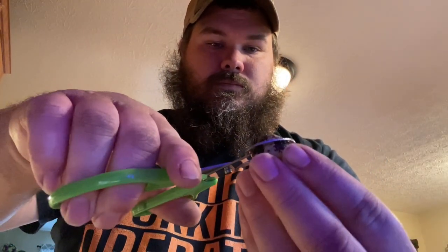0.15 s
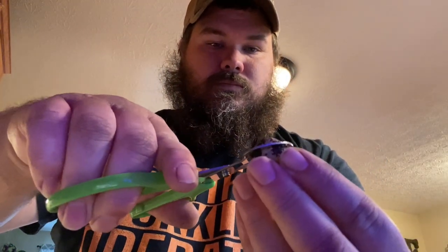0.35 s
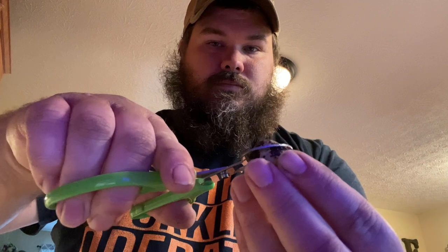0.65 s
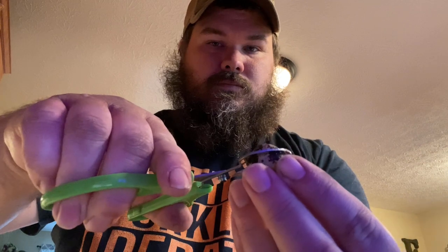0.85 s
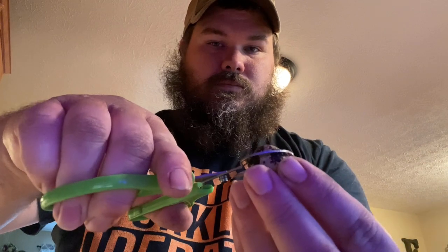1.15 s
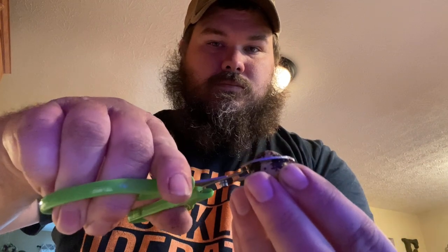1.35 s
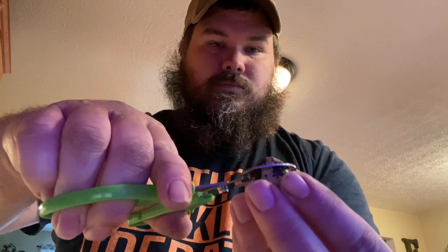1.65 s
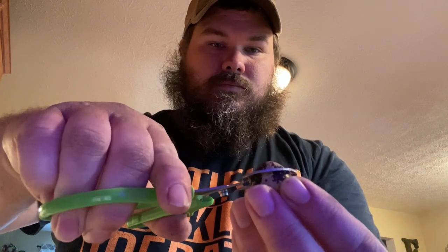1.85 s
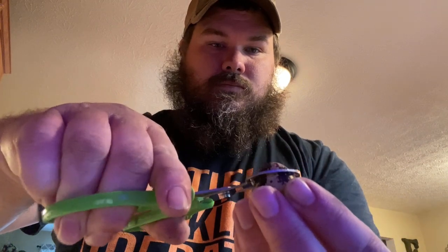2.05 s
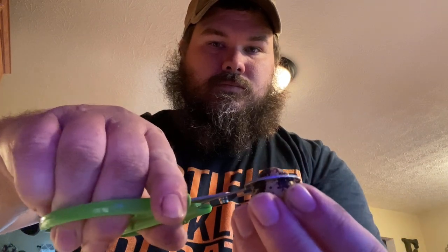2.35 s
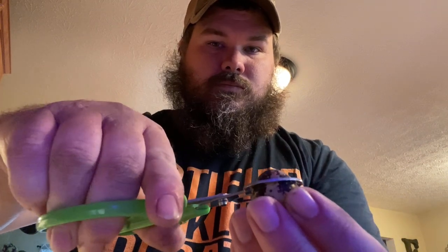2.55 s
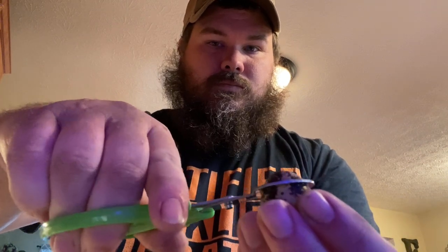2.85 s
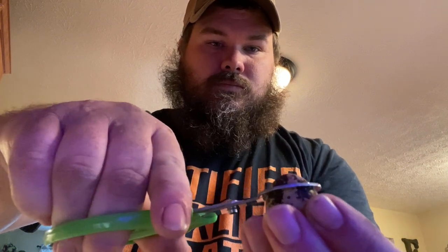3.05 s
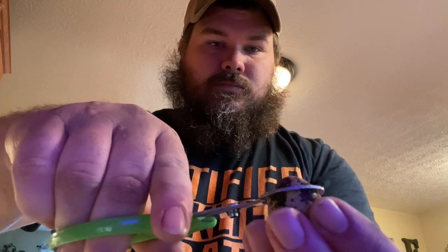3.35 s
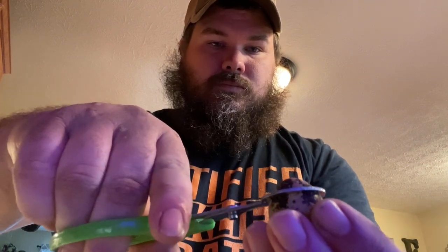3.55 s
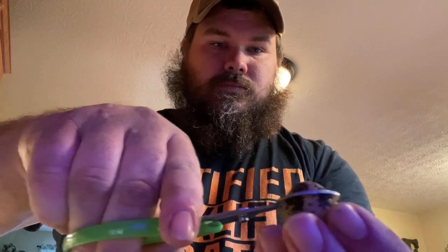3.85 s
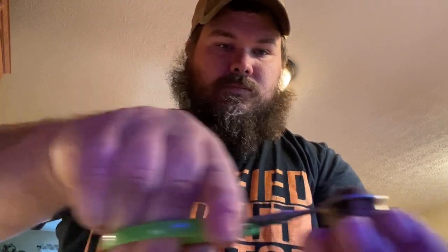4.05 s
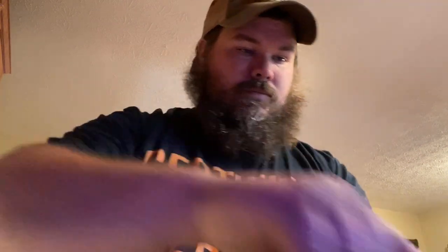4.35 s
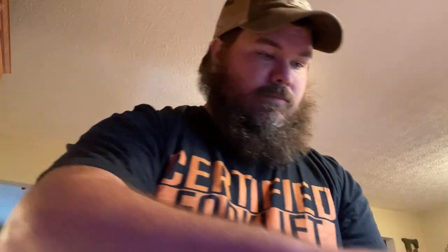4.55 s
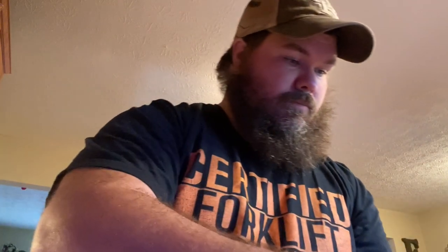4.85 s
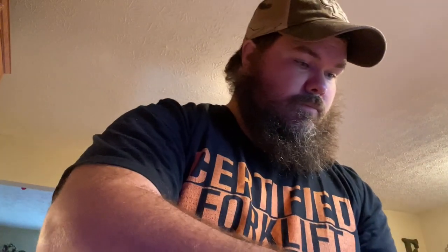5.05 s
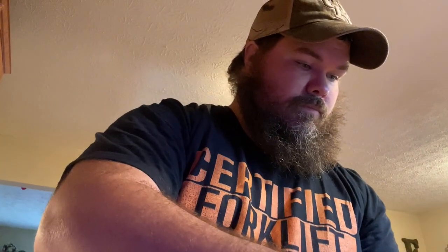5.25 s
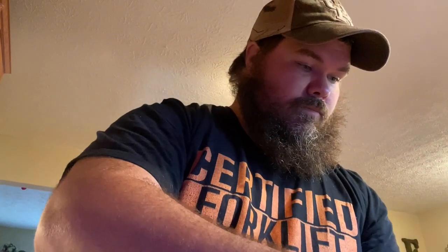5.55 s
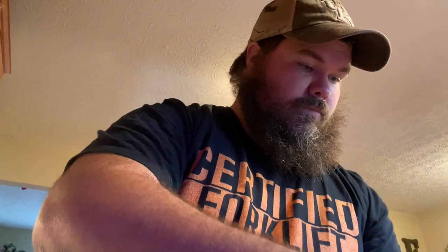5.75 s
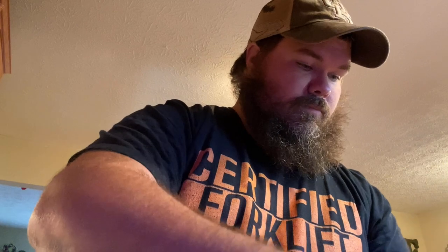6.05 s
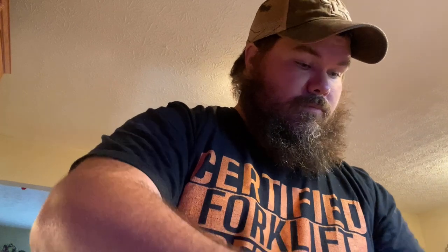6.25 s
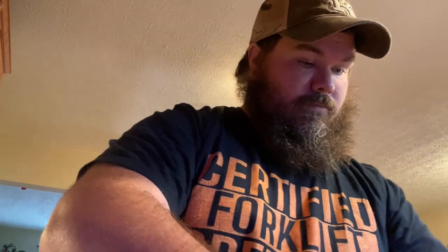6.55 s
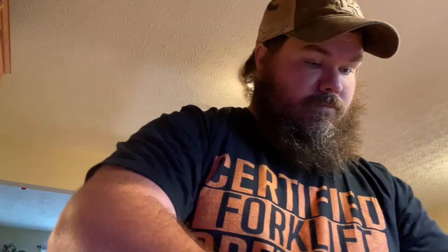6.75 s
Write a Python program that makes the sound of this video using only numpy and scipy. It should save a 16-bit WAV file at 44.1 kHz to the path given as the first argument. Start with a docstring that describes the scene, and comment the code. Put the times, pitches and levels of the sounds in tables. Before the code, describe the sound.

Close, sharp clicks and brittle shell cracks with faint scraping and wooden clatter in a quiet kitchen, ending in soft rustling and dull booms.

```python
"""In a kitchen, quail egg scissors click shut, then bite into a small egg close to the microphone.
Impulse bursts through resonances give sharp clicks, snaps and crunches; jolted steel rings, friction noise scrapes.
Further off, rattling blows excite the modes of something wooden. An arm reaches aside: cloth friction rustles.
Soft pushes under the clatter and from the arm boom at the table's low modes, over noise for room rumble and hiss."""
import sys
import numpy as np
from scipy import signal
from scipy.fft import rfft, irfft
from scipy.io import wavfile

SR = 44100
rng = np.random.default_rng(int(sys.argv[2]) if len(sys.argv) > 2 else 0)


def digitize_waveform(pressure):
    """Quantize a signal to 16-bit integers and store it at the path in sys.argv[1].

    Rows of a 2-D input are taken as channels; values are limited to [-1, 1].
    """
    field = np.atleast_2d(pressure).T
    bounded = np.clip(field, -1, 1)
    quanta = np.round(bounded * 32767).astype(np.int16)
    wavfile.write(sys.argv[1], SR, quanta)


N = 303408
TIME = np.arange(N) / SR   # s

# sharp clicks and snaps: the blades clicking shut at 0.32 s, then shell breaking, levels relative:
# start_s, energy_db, body_against_treble_db, crumbling_s
SNAPS = [(0.3213, -11.5, -2, .0008), (0.327, -20, -1, .0015), (0.3402, -23.5, -2, .0018),
         (0.378, -36, -20, 0.00092), (1.0659, -26, -16.5, 0.00086), (1.2896, -30.5, 7, 0.00054),
         (1.301, -20.5, -9, 0.00045), (1.3443, -14, -4, 0.00083), (1.3469, -14, -8.5, 0.00017),
         (1.3614, -16, -13, .0006), (1.3775, -11.5, -10, 0.00081), (1.395, -14.5, 0, 0.00035),
         (1.7061, -18.5, -1, 0.0017), (1.7449, -21, -7, 0.00015), (1.764, -15.5, -2.5, 0.00085),
         (1.7848, -9, -2.5, 0.0018), (1.7952, -21.5, -13.5, 0.0015), (1.9971, -20, 1, .0014),
         (2.007, -11.5, -3, .001), (2.0097, -4, -2, 0.00092), (2.483, -30, 1, .0004),
         (2.612, -31.5, -7, 0.00057), (2.786, -24.5, -9.5, 0.00053), (2.815, -25.5, -4, 0.0031),
         (2.926, -31, 2, 0.00026), (3.3141, -28, -6.5, 0.0018), (3.4933, -25, -4, 0.00055),
         (3.883, -42.5, -18, .0005), (3.95, -33.5, -1, 0.0009), (4.2396, -26.5, -2.5, 0.00029)]
# blades grinding through shell, levels relative: start_s, energy_db, body_against_treble_db, crumbling_s
CRUNCHES = [(2.173, -32, -10, 0.019), (2.437, -27.5, -3, 0.044), (2.487, -34, 11, 0.0087),
            (2.547, -35.5, -1, 0.0021), (2.62, -36, -15, 0.011), (2.646, -30.5, -7, .009),
            (2.688, -36.5, -4, 0.0055), (3.027, -32.5, 2.5, 0.012), (3.181, -33, 5, 0.0013),
            (3.238, -37, 5, 0.04), (3.307, -29, -11, 0.0072), (3.619, -21.5, -7, 0.0066),
            (3.633, -27, 5, 0.0044), (3.663, -32, -7, 0.0022), (3.735, -26, -1.5, 0.013),
            (3.776, -27, -4.5, 0.005), (3.836, -33, -4, 0.01), (3.916, -40.5, -14, .01),
            (3.966, -33.5, -3, 0.048), (4.037, -27.5, -5, 0.0059), (4.162, -29, -9, .004)]
# resonances of shell and blades, nominal: pitch_hz, width_hz, level_db
SHELL = [(290.2, 100, -16), (1018.5, 260, -4), (1637, 490, 3), (2375, 3000, -6), (3930, 600, -3.5),
         (5740, 1900, -5.5), (7200, 1100, -6), (8590, 890, -2), (9820, 550, -1), (11300, 1100, 0),
         (11840, 750, -5), (13500, 320, -4.5)]
# resonances of the egg once it is open, nominal: pitch_hz, width_hz, level_db
HOLLOW = [(300, 79, -4.5), (886, 122, 1)]


def from_db(db):
    """Level to amplitude: 20 dB is a factor of ten."""
    return 10 ** (np.asarray(db) / 20)


def unit(x):
    """Energy normalisation: the squares of each channel sum to one."""
    return x / np.sqrt(np.sum(x ** 2, axis=-1, keepdims=True) + 1e-20)


def at_hz(points, hz):
    """Spectral interpolation: read a table on a log-frequency axis."""
    table_hz, value = np.transpose(points)
    return np.interp(np.log(np.maximum(hz, 1)), np.log(table_hz), value)


def add(out, s, sound):
    """Superposition: mix a sound in at time s."""
    i = round(s * SR)
    out[..., i:i + sound.shape[-1]] += sound[..., :N - i]


def butter(x, hz, kind, order=2):
    """Causal filtering with a Butterworth response, flat in its passband."""
    hz = np.minimum(hz, SR / 2 - 1)
    return signal.sosfilt(signal.butter(order, hz, kind, fs=SR, output="sos"), x)


def convolve(x, response):
    """Linear response: every instant of the sound starts a copy of the impulse response."""
    return signal.fftconvolve(np.atleast_2d(x), response, axes=-1)[:, :N]


def noise(spectrum, side_db=0, size=N):
    """Spectral shaping of stereo noise, its side level setting how alike the ports are; rms 1."""
    white = rfft(rng.standard_normal((2, size)))
    hz = np.arange(size // 2 + 1) * SR / size
    mid, side = irfft(white * from_db(at_hz(spectrum, hz)), size)
    return unit(mid + from_db(side_db) * side * [[1], [-1]]) * np.sqrt(size)


def wander(hz):
    """Low-pass random fluctuation, changing little faster than hz; rms 1."""
    drift = butter(rng.standard_normal(N + SR), hz, "low")
    return unit(drift[SR:]) * np.sqrt(N)   # the filter has settled after one second


def ring(modes, t):
    """Modal superposition: struck modes are a sum of exponentially dying sines."""
    return sum(from_db(db - 60 * t / t60) * np.sin(2 * np.pi * hz * t) for hz, db, t60 in modes)


def fracture(length, per_s, first, spread_db, size=4096):
    """Impulsive excitation: a first break, then a dying random shower of tiny ones; energy 1."""
    happens = rng.random(size) < per_s / SR
    signs = rng.choice([-1, 1], size)
    grains = happens * signs * from_db(spread_db * rng.standard_normal(size))
    force = unit(grains * np.exp(-TIME[:size] / max(length, 1e-4)))
    force[0] += first
    return unit(force)


def rub(strokes, colour, grain_db, grain_hz):
    """Stick-slip friction: noise that catches and slips, swelling and dying with each stroke."""
    swell_db, release_db_per_s = 22.5, 197   # growth over one swell time, then the rate of decay
    grains = unit(noise(colour) * from_db(grain_db * wander(grain_hz))) * np.sqrt(N)
    out = 0
    for s, db, swell_s, top_hz in strokes:
        below_peak = np.maximum(swell_db * (s - TIME) / swell_s, release_db_per_s * (TIME - s))
        out = out + from_db(db - np.minimum(below_peak, 100)) * butter(grains, top_hz, "low")
    return out


def shell(events, modes, per_s, first, spread_db, body_db, crack_db=-5, detune=0.03, vary_db=0.8, lag_s=.0002):
    """Resonant excitation: each click or break rings the modes of shell and blades, a little differently."""
    out = np.zeros((2, N))
    low = np.array(modes)[:, 0] < 3000   # Hz
    for s, db, body, length in events:
        force = fracture(length, per_s, first, spread_db)
        rings = []
        for k, (hz, width, level) in enumerate(modes):
            radius = np.exp(-np.pi * width / SR)
            angle = 2 * np.pi * hz * (1 + detune * rng.standard_normal()) / SR
            gain = from_db(level + vary_db * rng.standard_normal()) * (1 - radius ** 2) / 2
            resonator = [1, -2 * radius * np.cos(angle), radius ** 2]
            # neighbouring modes have opposite signs
            rings.append((-1) ** k * gain * signal.lfilter([1, 0, -1], resonator, force))
        rings = np.array(rings)
        crack = from_db(crack_db) * unit(butter(force, [3000, 14000], "band"))
        treble = unit(unit(rings[~low].sum(0)) + crack)
        # bigger pieces favour the low modes
        low_ring = from_db(body + body_db) * unit(rings[low].sum(0))
        sound = from_db(db) * unit(low_ring + treble)
        # the left port hears it first, by a path that changes with the grip
        add(out[0], s, sound)
        add(out[1], s + lag_s * (.5 + rng.random()), sound)
    return out


def crumbs(count=3, length_s=0.0013):
    """Secondary fracture: every crunch sheds a few tiny chips at random delays just after it."""
    late_s, level_db, vary_db = .022, -13, 2.5   # mean delay, level against the crunch, spread
    chips = []
    for s, db, body, _ in CRUNCHES:
        for _ in range(count):
            chip_s = s + late_s * rng.exponential()
            chip_db = db + level_db + vary_db * rng.standard_normal()
            chips.append((chip_s, chip_db, body, length_s))
    return shell(chips, HOLLOW + SHELL, per_s=2900, first=0.55, spread_db=12.5, body_db=-4)


def blades(vary_db=2):
    """Damped modes: the steel rings briefly with each click and snap until the shell is cut through."""
    # modes of the steel blades: pitch_hz, level_db, t60_s
    steel_modes = [(1780, -1, 0.033), (2128, -10.5, 0.0463), (3630, 2, 0.032), (7630, -1, 0.026),
                   (7970, 0.5, .04)]
    cut_through_s = 2.1   # the shell gives way
    against_snap_db, most_db = -6.5, -16.5   # the ring against its click or snap, and its ceiling
    out, t = np.zeros((2, N)), TIME[:SR // 10]
    for s, db, _, _ in SNAPS:
        if s < cut_through_s:
            ring_db = min(db + against_snap_db, most_db)
            for port in out:
                modes = [(hz, level + vary_db * rng.standard_normal(), t60) for hz, level, t60 in steel_modes]
                add(port, s + 0.00036 * rng.random(), from_db(ring_db) * unit(ring(modes, t)))
    return out


def ticks(level_db=0, t60=0.0056):
    """Impulsive contact: handled things tick and squeak, each scratchy touch with one high ring."""
    # light touches, levels relative: start_s, level_db, pitch_hz, length_s
    touches = [(0.312, -34.5, 2300, 0.0052), (4.834, -42, 6250, 0.0095), (4.867, -37.5, 5750, 0.012),
               (4.928, -46, 5300, 0.015), (4.494, -44, 2850, 0.031), (4.995, -44.5, 3120, 0.056),
               (5.958, -54, 3490, 0.043), (6.148, -36.5, 4680, 0.0094)]
    out = np.zeros(N)
    for s, db, hz, length in touches:
        touch = fracture(length, per_s=4100, first=0.37, spread_db=7)
        high_ring = ring([(hz, 0, t60)], TIME[:len(touch)])
        add(out, s, from_db(db + level_db) * unit(signal.fftconvolve(touch, high_ring)))
    return out


def nearby(x, scatter_db, scatter_s):
    """Early scattering: hands and table spread the direct sound over a few milliseconds."""
    t = TIME[:2048]
    response = from_db(scatter_db) * unit(rng.standard_normal((2, len(t))) * np.exp(-t / scatter_s))
    response[:, 0] += 1   # the direct sound
    return convolve(x, unit(response))


def scrape(level_db=-2):
    """Stick-slip friction as the blade slides round the shell."""
    # slides, levels relative: peak_s, level_db, swell_s, cutoff_hz
    slides = [(2.86, -69, .7, 14060), (3.33, -68, 0.33, 13860), (4, -76.5, .8, 14000)]
    # steel sliding on shell: frequency_hz, density_db
    steel_colour = [(350, -39.5), (600, -16), (856, 1.5), (2000, -2), (4060, -10), (9000, -12),
                    (14000, -16.5)]
    return from_db(level_db) * rub(slides, steel_colour, grain_db=5, grain_hz=352.4)


def radiated(events, body_db=2, split_hz=3000):
    """Sound power: summed over all directions each event is a plain click, duller or brighter."""
    out, click = np.zeros(N), signal.unit_impulse(256)
    low = unit(butter(click, split_hz, "low"))
    high = unit(butter(click, split_hz, "high"))
    for s, db, body, _ in events:
        add(out, s, from_db(db) * unit(from_db(body + body_db) * low - high))
    return out


def kitchen(x, build_s=0.0013):
    """Diffuse reverberation: a tail that builds up quickly and decays at its own rate in each band."""
    # the room and what the scissors and egg radiate into it: frequency_hz, t60_s, level_db
    room_bands = [(198.2, .13, -3.5), (894, .26, -6), (1897, .26, 1), (2820, 0.23, -3.5), (3556, 0.25, 1),
                  (5614, 0.17, 1), (8200, 0.56, -2.5), (11000, 0.4, -3.5), (12600, .32, -1.5),
                  (16000, 0.083, -15.5)]
    t, response = TIME[:SR // 2], 0
    hz, t60, db = np.transpose(room_bands)
    white = rfft(rng.standard_normal((2, len(t))))
    bins = np.fft.rfftfreq(len(t), 1 / SR)
    for k, share in enumerate(np.eye(len(hz))):
        band = irfft(white * np.interp(bins, hz, share), len(t))
        response += band * from_db(db[k] - 60 * t / t60[k])
    return convolve(x, unit(response * (1 - np.exp(-t / build_s))))


def clatter(level_db=18, modes_db=0, low_hz=235, scuff_db=-20, dense_t60=0.4, clean_s=0.011):
    """Modal excitation: rattling, scuffing blows ring wood, heard mostly by way of the walls."""
    # blows, levels relative: start_s, level_db, contact_cutoff_hz, rattle_s
    knocks = [(0.67, -69.5, 800, 0.0073), (0.747, -66.5, 350, 0.0046), (1.353, -36, 1000, 0.0023),
              (1.375, -41.5, 900, 0.0011), (1.420, -34.5, 1100, 0.0033), (1.444, -44, 650, 0.016),
              (1.569, -32, 3515, 0.011), (1.594, -48, 1500, 0.024), (1.617, -44, 497, 0.0046),
              (1.648, -54, 1110, 0.0079), (6.844, -54.5, 400, 0.032)]
    # modes of the wood: pitch_hz, level_db, t60_s
    wood_modes = [(283, -12, 0.2), (332.2, 3, 0.31), (401.4, -1, 0.1), (452.4, -3.5, 0.26), (565, -1, 0.11),
                  (625, -43.5, 0.14), (723.4, -2, 0.17), (759, -2.5, 0.17), (857, -5, 0.41),
                  (994, -2, 0.19), (1036, -3.5, 0.31), (1468, -10, 0.27), (1720, -10, 0.29),
                  (2300, -28.5, .2)]
    # the dense ring of the wood: frequency_hz, density_db
    wood_colour = [(88, -53.5), (150, -5.5), (207, -24.5), (327, -5), (380, -16), (1000, -10),
                   (1210, -17.5), (1700, -17), (1980, -22), (8390, -28.5), (14000, -51)]
    force, t = np.zeros((2, N)), TIME[:SR // 2]
    for s, db, contact_hz, length in knocks:
        # a long rattle sets in more softly than a clean blow
        blows = np.array([fracture(length, per_s=3000, first=clean_s / length, spread_db=3.0) for _ in range(2)])
        scuff = from_db(scuff_db) * butter(blows, 10000, "high")
        add(force, s, from_db(db) * (unit(butter(blows, contact_hz, "low")) + scuff))
    dense = unit(noise(wood_colour, size=len(t)) * from_db(-60 * t / dense_t60))
    # every mode reaches each port by its own path
    modes = sum(ring([mode], np.maximum(t - rng.uniform(0, 0.00457, (2, 1)), 0)) for mode in wood_modes)
    response = dense + from_db(modes_db) * unit(modes)
    return from_db(level_db) * butter(convolve(force, response), low_hz, "high", order=3)


def thumps(level_db=1, shudder_db=-33, shudder_s=0.21, low_hz=42, high_hz=115):
    """Forced vibration: pairs of soft pushes set the table top swinging, and what stands on it shudders."""
    # low thumps of the table, each a pair of soft pushes: two under the clatter, the others from the arm,
    # levels relative: start_s, level_db, push_length_s, second_push_after_s, second_push_relative_db
    push_pairs = [(1.385, -49.5, .005, .02, -10), (1.592, -43, 0.0015, 0.14, -4),
                  (2.087, -39, .012, 0.038, 3.5), (4.8, -40.5, 0.0092, .037, 7.5),
                  (5.912, -29.5, 0.01, 0.081, -9), (6.404, -28.5, 0.015, .079, -5.5),
                  (6.838, -29.5, 0.0095, 0.039, -7)]
    # modes of the table top: pitch_hz, level_db, t60_s
    table_modes = [(48.35, -2, 0.58), (67, 8.5, 0.32), (88, 5.5, 0.039), (99.3, -0.5, 0.53),
                   (127.6, -11, 0.21)]
    # loose things on the table: frequency_hz, density_db
    shudder_colour = [(76, -33.5), (130, 2.5), (170, -13), (280, -22), (453, -39), (1500, -60),
                      (2000, -100)]
    force, shake, t = np.zeros(N), np.zeros(N), TIME[:SR // 2]
    for start, first_db, length, again_s, again_db in push_pairs:
        push = np.sin(np.pi * np.minimum(t / length, 1)) ** 2
        tremble = (1 - np.exp(-t / length)) * np.exp(-t / shudder_s)
        for s, db in (start, first_db), (start + again_s, first_db + again_db):
            s = min(s, TIME[-1])
            add(force, s, from_db(db) * push / push.sum())
            add(shake, s, from_db(db) * tremble)
    boom = butter(convolve(force, ring(table_modes, t)[None]), [low_hz, high_hz], "band", order=3)
    shudder = shake * noise(shudder_colour, side_db=-4.5)
    return from_db(level_db) * boom + from_db(shudder_db) * shudder


def sleeve(level_db=0):
    """Cloth friction: fibres catch and slip as the arm moves."""
    # strokes of the sleeve: peak_s, level_db, swell_s, cutoff_hz
    sleeve_strokes = [(4.19, -59, 0.042, 4570), (4.245, -64.5, 0.031, 5000), (4.5, -59.5, 0.013, 11730),
                      (4.85, -73, 0.038, 12070), (5.02, -70.5, 0.11, 8100), (5.2, -68, 0.11, 4080),
                      (5.38, -76.5, 0.043, 11060), (6.41, -65, .015, 6010), (6.86, -70.5, 0.054, 5990)]
    # cloth: frequency_hz, density_db
    cloth_colour = [(290, -6.5), (500, -9.5), (800, -4), (1880, -6.5), (2640, -5.5), (4200, -7.5),
                    (6570, -13), (9000, -4.5), (15000, -28)]
    return from_db(level_db) * rub(sleeve_strokes, cloth_colour, grain_db=2.0, grain_hz=307)


def background(low_hz=32):
    """Stationary noise: a wandering low rumble, much alike at both ports, under a faint hiss."""
    # room rumble: frequency_hz, density_db
    rumble_colour = [(12, -46.5), (20, -17.5), (43, -3.5), (65, 1), (108, -2), (121, -11.5), (130, -27),
                     (151, -25), (200, -29), (250, -39), (400, -79.5)]
    # room hiss: frequency_hz, density_db
    air_colour = [(88, -26.5), (150, 3.5), (162, -16.5), (303, -10), (447, -17.5), (1010, -19.5),
                  (1650, -26), (3400, -28.5), (5220, -32), (11500, -30), (14000, -36.5), (15200, -50)]
    rumble_db = -57 + 1 * wander(5.7)   # wanders by 1 dB rms, up to about 5.7 Hz
    rumble = from_db(rumble_db) * noise(rumble_colour, side_db=-14)
    hiss = from_db(-74) * noise(air_colour, side_db=0.5)
    return butter(rumble, low_hz, "high") + hiss


def scene():
    """Superposition of scissors and egg close by, the clatter further off and the table under the microphone."""
    snaps = shell(SNAPS, SHELL, per_s=6700, first=2.4, spread_db=9, body_db=-2.5, lag_s=.00023)
    crunch = shell(CRUNCHES, HOLLOW + SHELL, per_s=3100, first=0.12, spread_db=8.0, body_db=3.0, lag_s=.00023)
    close = from_db(1.5) * snaps + from_db(1.0) * crunch + blades() + crumbs() + ticks()
    direct = nearby(close, scatter_db=-2.0, scatter_s=0.0076)
    walls = from_db(-14.5) * kitchen(radiated(SNAPS) + radiated(CRUNCHES))
    table = (thumps() + background()) * from_db([[-.5], [.5]])   # left, right
    return direct + walls + scrape() + clatter() + table + sleeve()


def record(dry):
    """Interference: up the treble two ports fall in and out of step by turns; the top is cut steeply."""
    # how strongly the likeness of the two ports ripples: frequency_hz, share (clipped to 0-1)
    port_ripple = [(3000, 0), (5500, 0.1), (6500, .4), (7700, 1), (15000, .95)]
    port_delay_s, cutoff_hz = 0.0001915, 15600   # sound's travel time from port to port; top of the range
    hz = np.fft.rfftfreq(N, 1 / SR)
    opposed = np.clip(at_hz(port_ripple, hz), 0, 1) * np.cos(2 * np.pi * hz * port_delay_s)
    left, right = rfft(dry)
    mid = (left + right) / 2 * np.sqrt(1 - opposed)
    side = (left - right) / 2 * np.sqrt(1 + opposed)
    steep = signal.ellip(10, .5, 80, cutoff_hz, fs=SR, output="sos")
    return signal.sosfilt(steep, irfft([mid + side, mid - side], N))


dry = scene()
out = record(dry)
digitize_waveform(out)
```